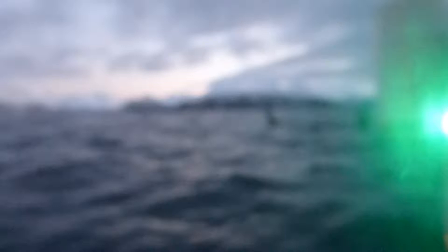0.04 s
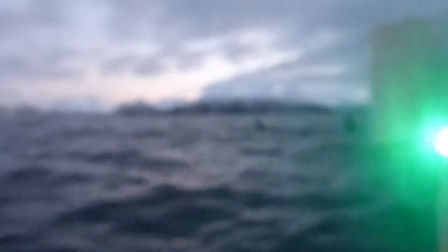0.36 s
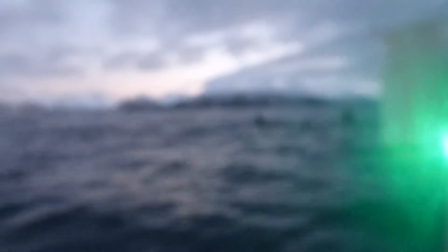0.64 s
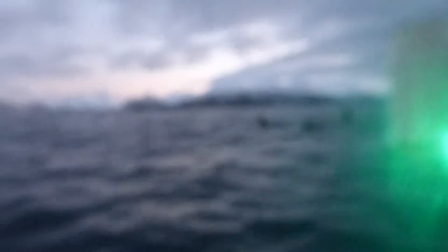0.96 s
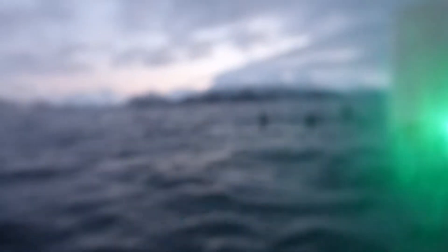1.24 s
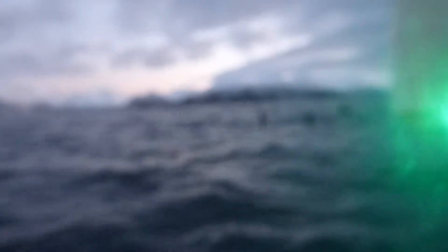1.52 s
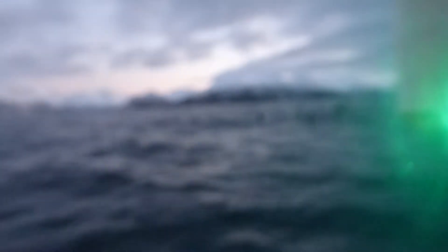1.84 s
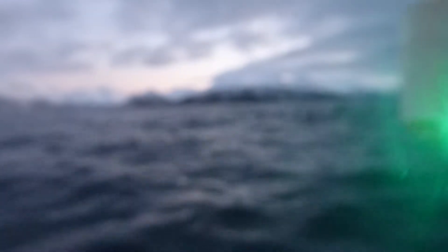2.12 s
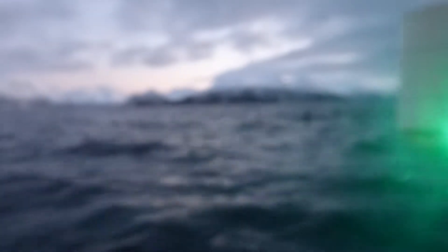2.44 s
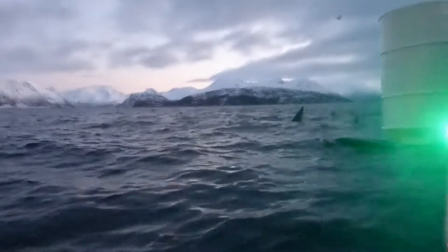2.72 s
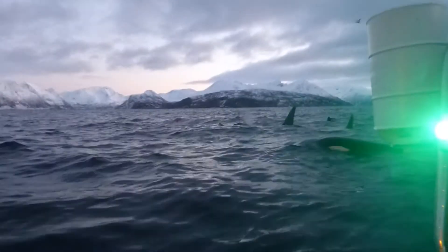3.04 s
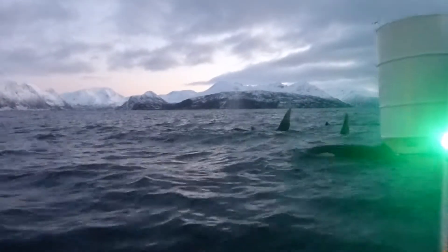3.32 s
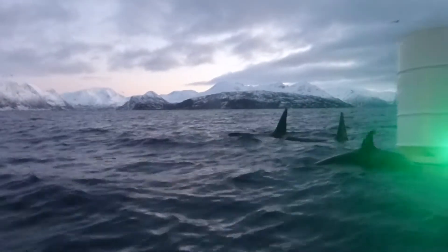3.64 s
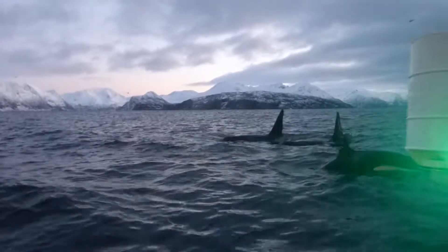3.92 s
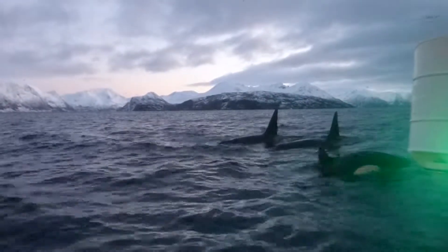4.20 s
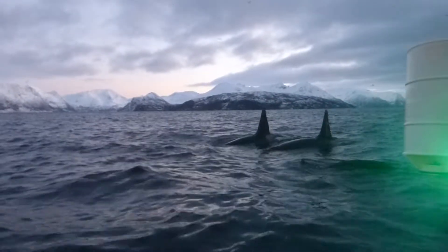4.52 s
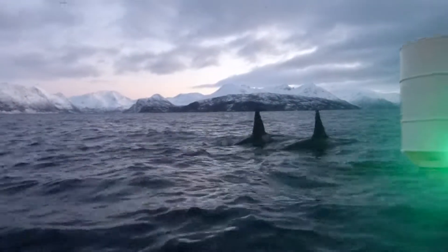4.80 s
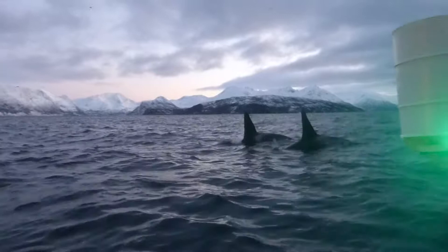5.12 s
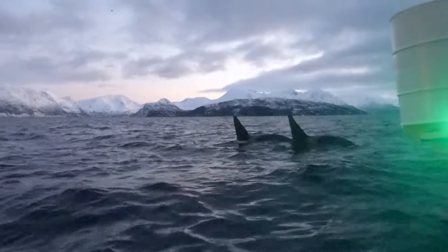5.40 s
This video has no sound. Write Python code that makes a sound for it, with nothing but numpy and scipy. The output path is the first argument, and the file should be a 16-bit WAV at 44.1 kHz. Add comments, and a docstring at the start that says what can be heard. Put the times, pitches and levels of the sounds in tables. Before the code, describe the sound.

After a brief silence, at about 0.35 seconds, choppy waves wash and fizz along a small boat while wind rumbles on the microphone. Lumpy gusts thud against it throughout, thickest from 0.6 to 2.4 seconds. Small watery plops and ticks of spray dot the first two seconds, and a sharp, hollow wind knock at 0.6 seconds briefly ducks the sound.

At about 2.5 seconds an orca surfaces slightly to the right, with a wheeze, a breathy blast and a hollow, faintly whistling gasp. A deeper blast comes at 3.1 seconds, a wet one at 3.25 and a long gasp around 3.5, among small splashes. Fainter blowing with thin, wavering whistles follows from 4 to 4.8 seconds. The wind buffets hard again from 4.2 to 5.2 seconds, with a loud knock at 4.6. The water swells until the end at about 5.5 seconds.

```python
"""Choppy waves wash and fizz around a small boat while wind rumbles on the two microphone openings (ports).
Spray ticks on the recorder's housing, trapped air plops, and swirls of wind thud and knock on the ports.
About 2.5 s in, orcas surface: air blasts from their blowholes, followed by hollow gasps and whistles.
The hardest knocks make the recorder turn itself down for a moment."""
import sys
import numpy as np
from scipy import signal
from scipy.fft import rfft, irfft, next_fast_len
from scipy.io import wavfile
from scipy.ndimage import uniform_filter1d

SR = 44100
rng = np.random.default_rng(int(sys.argv[2]) if len(sys.argv) > 2 else 0)


def to_wav(s):
    """Save 16-bit WAV."""
    ch = np.atleast_2d(s).T  # columns
    pcm = np.round(np.clip(ch, -1, 1) * 32767)  # PCM
    wavfile.write(sys.argv[1], SR, pcm.astype(np.int16))


N = 245195
TIME = np.arange(N) / SR
# How strong the wind is over time: time_s, level_db
WIND_STRENGTH = [(.4, -5.5), (.9, 3), (1.35, 3), (2.1, 0.5), (2.45, 4), (2.95, -4), (3.35, 1), (3.95, -3),
                 (4.3, 4), (4.9, 5), (5.5, -6)]


def from_db(db):
    """Turn decibels into a number to multiply a sound by."""
    return 10 ** (np.asarray(db) / 20)


def unit_power(x):
    """Scale a sound to an average power of 1."""
    return x / np.sqrt(np.mean(x ** 2) + 1e-20)


def panned(lean_db):
    """Left and right gains: a positive lean is to the left, a negative one to the right."""
    return unit_power(from_db([[lean_db / 2], [-lean_db / 2]]))


def drift(rate_hz):
    """A smooth random wander, about 1 in size; a higher rate wanders faster."""
    pole = np.exp(-80 * np.pi * rate_hz / SR)
    slow = signal.lfilter([1], [1, -2 * pole, pole * pole], rng.standard_normal(N // 40 + 2002))[2000:]
    return np.interp(np.arange(N) / 40, np.arange(len(slow)), unit_power(slow))


def coloured(x, colour):
    """Shape a sound's bass and treble with rows of (pitch_hz, level_db); the result has power 1."""
    size = next_fast_len(N)
    hz = np.arange(size // 2 + 1) * SR / size
    points_hz, levels_db = np.transpose(colour)
    gain = from_db(np.interp(np.log(hz + 1), np.log(points_hz), levels_db))
    gain = gain * np.minimum(hz / points_hz[0], 1) / np.maximum(hz / points_hz[-1], 1) ** 2
    return unit_power(irfft(rfft(x, size) * gain, size)[..., :N])


def turbulence(alike):
    """White noise at the two ports: alike is 1 for the same noise, 0 for unrelated, -1 for opposite."""
    mid, side = rng.standard_normal((2, N))
    return np.sqrt((1 + alike) / 2) * mid + np.sqrt((1 - alike) / 2) * side * [[1], [-1]]


def ring(clicks, hz, ring_s):
    """Each click starts a tone that fades by 60 dB in ring_s."""
    decay, step = from_db(-60 / (ring_s * SR)), 2 * np.pi * hz / SR
    return signal.lfilter([0, np.sin(step)], [1, -2 * decay * np.cos(step), decay ** 2], clicks + 1e-18)


def struck(knocks, tones):
    """A knocked object rings at all of its own tones at once."""
    return sum((-1) ** k * from_db(level_db) * ring(knocks, hz, ring_s)
               for k, (hz, level_db, ring_s) in enumerate(tones))


def crackle(per_s, spread_db, low_hz, high_hz, scatter_db):
    """Small bubbles ring at random, each with its own size, pitch and side."""
    born = rng.random(N) < per_s / SR
    sizes = born * from_db(spread_db * np.minimum(rng.exponential(1, N), 4)) * rng.choice([-1, 1], N)
    clicks = sizes * from_db(rng.normal(0, scatter_db, N) * np.array([[1], [-1]]))
    pitches = np.geomspace(low_hz, high_hz, 14)
    chosen = rng.integers(0, len(pitches), N)
    return unit_power(sum(hz * ring(clicks * (chosen == k), hz, 9 / hz) for k, hz in enumerate(pitches)))


def sea(wash_db, foam_db, bubble_db, slosh_db, tick_db):
    """Waves wash along the hull under a fizz of bursting foam and ticking droplets."""
    # Tone colours of the low wash and the bright foam: pitch_hz, level_db
    wash_colour = [(150, -2.5), (300, -0.5), (500, -1), (780, -6), (1100, -9), (1700, -12), (2800, -15),
                   (4500, -25), (8000, -44.5)]
    foam_colour = [(1200, -15), (2500, 4), (4000, 0.5), (6000, -1.5), (8000, -5.5), (10000, 0.5),
                   (11500, -2.5), (13000, -11), (15500, -38)]
    wash_gain, foam_gain = water_strength()
    churn = turbulence(alike=0.76)
    churn += from_db(bubble_db) * crackle(per_s=460, spread_db=5.5, low_hz=512, high_hz=3950, scatter_db=5)
    wash = coloured(churn, wash_colour) * wash_gain * from_db(wash_db + slosh_db * drift(21.4))
    fizz = turbulence(alike=0.83)
    fizz += from_db(-3.5) * crackle(per_s=2000, spread_db=2, low_hz=1400, high_hz=12500, scatter_db=3)
    ticks = from_db(tick_db) * crackle(per_s=77, spread_db=7.5, low_hz=2520, high_hz=12100, scatter_db=2)
    foam = clustered(coloured(fizz + ticks, foam_colour), patchy_db=1.5, rate_hz=7.3)
    foam *= foam_gain * from_db(foam_db + 0.91 * drift(32))
    return wash * panned(-1.5) + foam * panned(-1.2)


def water_strength(rise_share=0.34):
    """Gains of wash and foam: the slow swell plus splashes that rise quickly and die away."""
    # The sea's slow swell along the hull: time_s, wash_db, foam_db
    swell = [(0.351, -44.5, -53), (.55, -43, -55.5), (.95, -47, -53.5), (1.3, -42, -54.5),
             (1.65, -43.5, -53.5), (2.05, -47, -55.5), (2.25, -48, -64), (2.48, -57.5, -57),
             (2.98, -44, -55.5), (3.7, -43, -62), (4.05, -44.5, -53), (4.35, -41, -52.5), (4.7, -43.5, -53),
             (5.0, -44.5, -57.5), (5.25, -42, -48), (5.54, -39.5, -49)]
    # Wavelets breaking and spray falling back: peak_s, wash_db, foam_db, length_s
    splashes = [(1.203, -41.5, -50, 0.041), (1.9, -43, -56.5, 0.28), (3.147, -38.5, -43, 0.17),
                (3.382, -32, -59, 0.13), (3.877, -35.5, -47, 0.082), (4.57, -38, -58, 0.063),
                (4.857, -51, -51.5, 0.037), (5.195, -36, -51, 0.019)]
    times_s, *levels_db = np.transpose(swell)
    power = from_db([np.interp(TIME, times_s, level_db) for level_db in levels_db]) ** 2
    for peak_s, wash_db, foam_db, length_s in splashes:
        age = (TIME - peak_s) / length_s
        shape = np.exp(-np.where(age < 0, (age / rise_share) ** 2, age))
        power += from_db([[wash_db], [foam_db]]) ** 2 * shape
    return np.sqrt(power)


def clustered(fizz, patchy_db, rate_hz):
    """Bubbles burst in clusters of like size, so each pitch band of the fizz swells on its own."""
    bands = []
    for top_hz in (2500, 5000, 9000):
        bands.append(signal.sosfiltfilt(signal.butter(2, top_hz, fs=SR, output="sos"), fizz - sum(bands)))
    bands.append(fizz - sum(bands))
    return sum(band * from_db(patchy_db * drift(rate_hz)) for band in bands)


def wind_rumble(level_db, gusty_db):
    """Wind on the ports keeps up a low, uneven rumble."""
    # Tone colour of the rumble: pitch_hz, level_db
    colour = [(25, -41), (50, -43), (90, -8.5), (150, 3), (240, -0.5), (400, -13.5), (700, -24.5),
              (1500, -31.5)]
    gusts = from_db(gusty_db * (1.2 * drift(50) + 1.57 * np.array([drift(23), drift(46)])))
    strength = from_db(level_db + np.interp(TIME, *np.transpose(WIND_STRENGTH)))
    return strength * unit_power(coloured(turbulence(alike=0.9), colour) * gusts) * panned(-5.5)


def spray_drops(level_db, splat_s):
    """Each drop of spray spreads over a moment and sets the housing ticking."""
    # Drops landing: start_s, strength_db
    landings = [(0.395, -38), (0.5112, -36), (0.643, -32.5), (1.0632, -30.5), (1.807, -38), (2.257, -43.5),
                (2.14, -39), (2.15, -33), (3.808, -38), (3.876, -32), (4.44, -38), (4.525, -40)]
    # The housing's own tones: pitch_hz, level_db, ring_s
    housing_tones = [(2070, -5, 0.015), (3040, 9, 0.0037), (4650, 10.5, 0.0018), (6740, 7.5, 0.00092),
                     (9100, -0.5, 0.0067), (11250, 2.5, 0.0033)]
    splats = np.zeros(N)
    for start_s, strength_db in landings:
        push = rng.standard_normal(N) / (1 + ((TIME - start_s) / splat_s - 1) ** 4)
        splats += from_db(strength_db + level_db) * push / np.linalg.norm(push)
    return struck(splats, housing_tones) * panned(-5.5)


def plops(onset_s, wobble):
    """Trapped air rings, gliding and wobbling in pitch as its pocket changes shape."""
    # Air pockets closing in the waves: start_s, pitch_hz, level_db, ring_s, glide_octaves_per_s
    air_pockets = [(0.423, 1540, -34, 0.042, -5), (.473, 875, -31.5, 0.33, -12.5),
                   (0.573, 1130, -39, .06, 6), (0.59, 1190, -26, 0.054, 4), (.619, 1420, -29, 0.034, 1),
                   (0.643, 1200, -15, 0.012, 4), (1.186, 1160, -20.5, 0.014, -95),
                   (1.353, 1400, -20, 0.0073, 2), (2.158, 974, -36, 0.12, 0)]
    out = np.zeros(N)
    for start_s, hz, level_db, ring_s, glide in air_pockets:
        age = np.clip(TIME - start_s, 0, 2 * ring_s)
        pitch_hz = hz * 2 ** (glide * age) * (1 + wobble * drift(90))
        phase = 2 * np.pi * np.cumsum(pitch_hz * (age > 0)) / SR
        out += from_db(level_db - 60 * age / ring_s) * (1 - np.exp(-age / onset_s)) * np.sin(phase)
    return out * panned(-6)


def wind_buffets(thud_db, rasp_db, lumpy_db, rise_share, fall_share, low_hz):
    """Swirls of air strike each port in short, lumpy bursts: a low thud with a rasp on top."""
    # The strong bursts: middle_s, level_db, length_s, lean_db, extra_rasp_db
    strong_bursts = [(0.583, -27, 0.014, -10.5, 0), (0.608, -17.5, 0.01, -17, -12),
                     (0.649, -13, 0.03, -4.5, -12), (0.77, -21, 0.0041, -25, -14),
                     (0.804, -30, 0.021, -1, 0), (0.84, -16, 0.0083, -9, -0.5),
                     (0.867, -15, 0.033, -2.5, -9.5), (0.926, -11.5, 0.018, -1, -8),
                     (0.998, -15.5, 0.041, 0, -4), (1.018, -9.5, 0.0053, -3, -6),
                     (1.035, -13.5, 0.014, 1, -12), (1.076, -18.5, 0.0076, 1, -8),
                     (1.127, -18.5, 0.0055, -25, -16), (1.161, -23, 0.022, 1, -5),
                     (1.257, -21, 0.039, -3.5, -12), (1.299, -14.5, 0.0072, -1.5, -0.5),
                     (1.335, -18.5, 0.04, -5.5, -2), (1.412, -25, 0.022, 2, -1.5),
                     (1.426, -12, 0.012, -9, -8), (1.449, -12, 0.021, 4.5, -5),
                     (1.625, -18.5, 0.031, 2.5, -9), (1.681, -20, 0.023, -4, -9),
                     (1.785, -19.0, 0.033, 2.5, -6.5), (1.947, -20.5, 0.009, 1, -14),
                     (1.989, -17, 0.021, -4, -6.5), (2.048, -15.5, 0.0048, 14, -7.5),
                     (2.068, -18.5, 0.018, 0.5, -8), (2.213, -17.5, 0.018, -2.5, -3.5),
                     (2.347, -19, 0.0076, 7, -24), (2.37, -27.5, 0.03, 4, -10), (2.385, -9.5, 0.018, 0, -3),
                     (2.562, -17, 0.0092, -0.5, -4.5), (2.689, -24.5, 0.041, -3, -3.5),
                     (3.151, -15.5, 0.0086, 7.0, -17), (3.302, -22, 0.0082, -5, -12),
                     (3.398, -20, 0.02, -7, -5), (3.434, -15, 0.032, 0.5, -14),
                     (3.597, -26, 0.01, -16, -26), (3.742, -23, 0.028, -7, -12),
                     (3.872, -25, 0.03, -3, -10), (4.095, -24, 0.012, -11, -22),
                     (4.127, -13.5, 0.021, -6, -10), (4.207, -19, 0.0074, -18, -11),
                     (4.231, -14.5, 0.019, 0, -6.5), (4.29, -20, 0.022, -0.5, -5),
                     (4.318, -11.5, 0.0037, -4, -0.5), (4.359, -20.5, 0.014, -2, -9),
                     (4.393, -14.5, 0.031, -3.5, -7.5), (4.438, -13.5, 0.018, -2, -1.5),
                     (4.459, -11.5, 0.011, -3, -2), (4.509, -11, 0.0053, -11, -16),
                     (4.617, -14.5, 0.0075, -1.5, -3), (4.649, -13.5, 0.02, -3.5, 1.5),
                     (4.677, -28, 0.017, 4, 8), (4.765, -21.5, 0.0065, -11, -7),
                     (4.779, -5.5, 0.005, -4.5, -2), (4.796, -11.5, 0.0089, 7, -6),
                     (4.841, -15.5, 0.011, -11, -5.5), (4.89, -22, 0.012, -4, 2),
                     (4.916, -15.5, 0.013, -7, -3), (4.943, -16.5, 0.014, 8, 0),
                     (4.99, -13, 0.013, 0.5, -11.5), (5.133, -19, 0.032, -3.5, -0.5),
                     (5.168, -13, 0.01, 0.5, -8), (5.199, -22.5, 0.021, 0.5, -1.5),
                     (5.435, -8, 0.0052, -13, -17), (5.455, -25, 0.013, -5, -14)]
    # Tone colours of the thud and the rasp: pitch_hz, level_db
    thud_colour = [(30, -16), (50, -30), (80, -11), (120, -0.5), (170, 2), (270, 4), (370, -3.5),
                   (490, -12), (700, -41), (1200, -77)]
    rasp_colour = [(290, -5), (420, 9.5), (560, 3), (800, -8), (1200, -20.5), (2000, -33.5), (4000, -51),
                   (9000, -67)]
    lumps = from_db(lumpy_db * np.array([drift(174), drift(138)]))
    thud = coloured(turbulence(alike=0.68) * lumps, thud_colour)
    rasp = coloured(turbulence(alike=-0.65) * lumps, rasp_colour)
    out = np.zeros((2, N))
    for middle_s, level_db, length_s, lean_db, extra_rasp_db in strong_bursts + small_swirls():
        near = np.abs(TIME - middle_s) < .08
        age = (TIME[near] - middle_s) / length_s
        swell = np.exp(-2 * np.where(age < 0, (age / rise_share) ** 2, np.abs(age / fall_share) ** 1.5))
        for flow, flow_db in ((thud, thud_db), (rasp, rasp_db + extra_rasp_db)):
            burst = flow[:, near] * swell
            burst /= np.sqrt(np.sum(burst ** 2, axis=1, keepdims=True) / np.sum(swell ** 2))
            out[:, near] += burst * from_db(level_db + flow_db) * panned(lean_db)
    return signal.sosfilt(signal.butter(2, low_hz, "high", fs=SR, output="sos"), out + 1e-18)


def small_swirls(per_s=11, level_db=-33.5, spread_db=6, length_s=0.01, scatter_db=3.5, rasp_db=-10.5):
    """Weak bursts come at random and follow the wind's strength; same columns as the strong ones."""
    timing, loudness, stretch, side = rng.standard_normal((120, 4)).T
    middle_s = (np.arange(len(timing)) + timing / 2) / per_s
    levels_db = level_db + np.interp(middle_s, *np.transpose(WIND_STRENGTH)) + spread_db * loudness
    lengths_s = length_s * 2 ** (stretch / 2)
    rows = np.transpose([middle_s, levels_db, lengths_s, scatter_db * side, np.full(len(side), rasp_db)])
    return list(rows[(middle_s > 0) & (middle_s < TIME[-1])])


def hard_knocks(level_db, contact_s, crack_band_hz):
    """Hard wind buffets knock on the microphone with a brief crack and a hollow ring."""
    # The hard buffets: start_s, strength_db
    hits = [(0.643, -10), (0.838, -19), (1.297, -26), (2.385, -29), (4.645, -6), (4.779, -46), (5.115, -24)]
    # Tones of the hollow ring: pitch_hz, level_db, ring_s
    knock_tones = [(654, 11, 0.013), (876, -1.5, 0.029), (1030, -6, 0.011), (1295, -8.5, 0.0047),
                   (1590, -18, 0.014), (2150, -12.5, 0.01)]
    knocks = np.zeros((2, N))
    rough_air = turbulence(alike=-0.35)
    for start_s, strength_db in hits:
        age = np.maximum(TIME - start_s, 0) / contact_s
        push = rough_air * age * np.exp(-np.minimum(age, 50))
        knocks += from_db(strength_db + level_db) * push / np.linalg.norm(push)
    crack = signal.sosfilt(signal.butter(2, crack_band_hz, "band", fs=SR, output="sos"), knocks + 1e-18)
    return crack + struck(knocks, knock_tones)


def orcas(sputter_db, mist_db):
    """Air rushes through each blowhole, rings in the airway and sputters with the water it throws."""
    # In order: wheeze, blast, hollow gasp, hiss, deeper blast, wet blast, long gasp, far-off blowing.
    # Columns: full_flow_s, level_db, rise_s, hold_s, fall_s, lean_db
    breaths = [(2.536, -35, 0.013, 0.0076, 0.11, -4), (2.567, -26.5, 0.029, 0.07, 0.19, -3),
               (2.654, -28, 0.044, 0.2, 0.22, -3.5), (2.742, -43.5, 0.065, 0.061, 0.21, -3),
               (3.076, -24, 0.034, 0.036, 0.26, -2.5), (3.249, -27, 0.04, 0.036, 0.55, -1.5),
               (3.458, -29, 0.15, 0.18, 0.25, -3), (4.06, -36, 0.15, 0.68, 0.15, -3.5)]
    # Tone colour, one list for each breath: pitch_hz, level_db
    colours = [
        [(600, 18), (1100, 8), (2300, -1), (4500, -1), (6000, -16), (11000, -27), (14000, -40)],
        [(150, -45), (250, -14), (658, -2), (1030, -6), (1120, -4), (1410, -6.5), (2240, -6), (2620, -6.5),
         (4550, -19.5), (5130, -21.5), (8000, -19.5), (11000, -13.5), (13000, -21), (14500, -50), (15500, -86)],
        [(160, -56), (280, -19), (470, -4), (744, -6), (850, 8), (990, -12.5), (1530, -12), (2400, -29),
         (2800, -20), (5000, -35), (6500, -62), (11000, -120)],
        [(3000, -21), (5000, 1.5), (6800, 1), (8500, -7), (11300, 4.5), (13000, -9), (15000, -45)],
        [(150, -4), (250, -20), (392, -5), (544, 2.5), (705, 1), (823, -7.5), (1430, -8), (1640, -8),
         (2620, -10.5), (6650, -38), (10100, -32), (13700, -47), (15500, -73)],
        [(150, -38), (250, -17), (466, -0.5), (593, -8), (692, -6), (1030, -7.5), (1200, -5.5), (1700, -13.5),
         (5500, -18), (8180, -20.5), (10000, -14.5), (11500, -18), (13000, -32), (14300, -42), (15500, -90)],
        [(150, -36), (250, -20), (427, 5), (995, -8.5), (1180, -7), (1790, -13.5), (1990, -13), (2710, -7),
         (3510, -20), (4320, -17.5), (5600, -30), (10800, -55), (13000, -56), (15500, -76)],
        [(300, -21), (600, 4), (1350, -8.5), (1600, -20), (3000, -13.5), (6000, -35)],
    ]
    # Airway resonances, one list for each breath: pitch_hz, width_hz, lift_db, glide_hz_per_s
    airways = [
        [(4450, 280, 1, -3000)],
        [(440, 50, 16, 0), (687, 29, 10.5, 4), (850, 130, 5.5, 0), (2010, 32, 7.5, 0), (2270, 47, 9, -400),
         (2850, 81, 5, 0), (4570, 210, 5, 0)],
        [(486, 210, 7, 0), (820, 150, -1, 200), (1130, 90, 10, 200), (1520, 90, 7.5, 500)],
        [(6260, 150, 2, 0), (6560, 150, 5, 0)],
        [(543, 54, 5.5, 600), (670, 45, 6, 1303), (1020, 150, 6, 800), (1330, 190, 4.5, 900),
         (2370, 200, -4, 0)],
        [(370, 50, 14, 0), (684, 44, 10, 0), (3160, 820, 5.5, 0)],
        [(455, 110, -1, 0), (1190, 58, 8, -4), (2125, 36, 12, -450), (2320, 76, 4.5, 900),
         (2450, 120, 2.5, 1600), (4300, 200, 5, 900)],
        [(613, 55, 7, 0), (745, 64, 2, 80), (840, 95, 9, -4), (1200, 77, 15.5, 54), (1400, 52, 15.5, 28),
         (2115, 85, 15.5, 0)],
    ]
    out = whistles(waver=0.027, flutter_db=0.5) * panned(-7)
    mist = from_db(mist_db) * crackle(per_s=6500, spread_db=5.5, low_hz=1400, high_hz=14300, scatter_db=2)
    for (full_flow_s, level_db, *shape_s, lean_db), colour, airway in zip(breaths, colours, airways):
        age = TIME - full_flow_s
        near = (age > -.5) & (age < 1.3)
        jet = coloured(turbulence(alike=0.96) + mist, colour)[:, near]
        jet *= signal.windows.tukey(near.sum(), .1)  # soften both ends
        flow = from_db(level_db + airflow_db(age, *shape_s) + sputter_db * drift(51))
        blow = np.zeros((2, N))
        blow[:, near] = through_airway(jet, age[near], airway) * flow[near]
        out += placed(blow, lean_db)
    return out


def airflow_db(age, rise_s, hold_s, fall_s, sag_db_per_s=9.5, range_db=20):
    """A breath bursts out, weakens while held and dies away, moving range_db in rise_s and in fall_s."""
    closed = np.maximum(-age / rise_s, 0) + np.maximum((age - hold_s) / fall_s, 0)
    return -sag_db_per_s * np.clip(age, 0, hold_s) - range_db * np.minimum(closed, 10)


def through_airway(air, age, resonances):
    """The airway lifts or dips narrow pitch bands, which glide as the blowhole changes shape."""
    for hz, width_hz, lift_db, glide in resonances:
        carrier = np.exp(2j * np.pi * (hz * age + glide * age ** 2 / 2))
        pole = np.exp(-np.pi * width_hz / SR)
        # Slide the band down to 0 Hz and smooth away the rest; the next line slides it back.
        band = signal.filtfilt([1 - pole], [1, -pole], air / carrier, padlen=0)
        air = air + (from_db(lift_db) - 1) * 2 * (band * carrier).real
    return unit_power(air)


def whistles(waver, flutter_db):
    """For a moment the airflow locks onto a resonance and sings a breathy, unsteady note."""
    # Whistles in the blowholes: middle_s, pitch_hz, level_db, length_s
    notes = [(2.541, 4450, -47, 0.01), (2.607, 4260, -46, 0.054), (2.77, 1497, -38, 0.08),
             (2.865, 850, -47, .035), (3.9, 1350, -47.5, 0.11), (4.1, 1170, -46, .04),
             (4.26, 1236, -43, 0.091), (4.54, 1400, -45, 0.13)]
    out = np.zeros(N)
    for middle_s, hz, level_db, length_s in notes:
        phase = 2 * np.pi * np.cumsum(hz * (1 + waver * drift(65))) / SR
        swell = np.exp(-2 * ((TIME - middle_s) / length_s) ** 2)
        out += np.sqrt(2) * np.sin(phase) * swell * from_db(level_db + flutter_db * drift(30))
    return out


def placed(x, lean_db, lag_s_per_db=4e-6):
    """Sound from one side reaches the far port weaker and a little later."""
    size = next_fast_len(N)
    hz = np.arange(size // 2 + 1) * SR / size
    lag_s = lag_s_per_db * lean_db / 2 * np.array([[-1], [1]])
    return irfft(rfft(x, size) * np.exp(-2j * np.pi * hz * lag_s), size)[:, :N] * panned(lean_db)


def with_hull_echo(x, lag_s, echo_db):
    """The boat's side adds a very quick echo, whose path sways with the swell."""
    delayed_index = np.arange(N) - SR * lag_s * (1 + 0.02 * drift(0.52))
    echo = np.array([np.interp(delayed_index, np.arange(N), side, left=0) for side in x])
    return x + from_db(echo_db) * echo


def scene():
    """Water and whales, slightly to the right, with the wind blowing straight on the ports."""
    water = sea(wash_db=3, foam_db=1.56, bubble_db=-13, slosh_db=2, tick_db=-14)
    water += plops(onset_s=0.00066, wobble=0.035)
    water += spray_drops(level_db=-1.5, splat_s=0.0017)
    wind = wind_buffets(thud_db=0, rasp_db=2, lumpy_db=5, rise_share=0.82, fall_share=1.14, low_hz=85)
    wind += wind_rumble(level_db=-34, gusty_db=3.5)
    whales = with_hull_echo(orcas(sputter_db=1.26, mist_db=-12), lag_s=0.0065, echo_db=-16.5)
    knocks = hard_knocks(level_db=1, contact_s=0.00045, crack_band_hz=(650, 1700))
    return water + wind + knocks + whales


def gain_control(x, above_db=-13, cut_share=0.35, attack_s=0.008, recovery_db_per_s=48, sense_s=0.0018):
    """The recorder turns itself down after a loud knock and comes back up at a steady rate."""
    power = uniform_filter1d(np.max(x ** 2, axis=0), size=int(sense_s * SR))
    over_db = np.maximum(10 * np.log10(np.abs(power) + 1e-12) - above_db, 0)
    recovery_db = recovery_db_per_s * TIME
    cut_db = np.maximum.accumulate(cut_share * over_db + recovery_db) - recovery_db
    pole = np.exp(-1 / (attack_s * SR))
    return x * from_db(-signal.lfilter([1 - pole], [1, -pole], cut_db))


def record(dry, shade_db=-2.5, shade_hz=5000, wind_cut_hz=64, start_s=0.346, top_hz=15700):
    """A bass cut and a gain control tame the wind, and the housing shades the left side's treble."""
    dry = signal.sosfilt(signal.butter(4, wind_cut_hz, "high", fs=SR, output="sos"), dry)
    treble = signal.sosfilt(signal.butter(1, shade_hz, "high", fs=SR, output="sos"), dry)
    shaded = dry + treble * (from_db([[shade_db / 2], [-shade_db / 2]]) - 1)
    fade_in = np.clip((TIME - start_s) / .002, 0, 1)  # silent until start_s
    heard = np.clip(gain_control(shaded), -1, 1) * fade_in
    return signal.sosfilt(signal.ellip(10, .1, 90, top_hz, fs=SR, output="sos"), heard)


dry = scene()
out = record(dry)
to_wav(out)
```